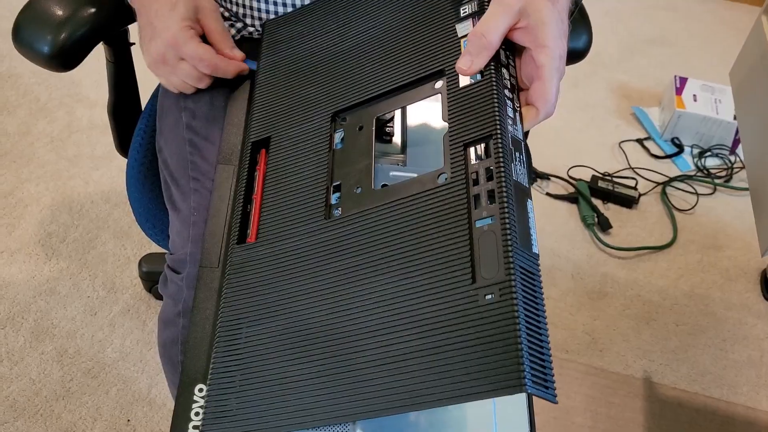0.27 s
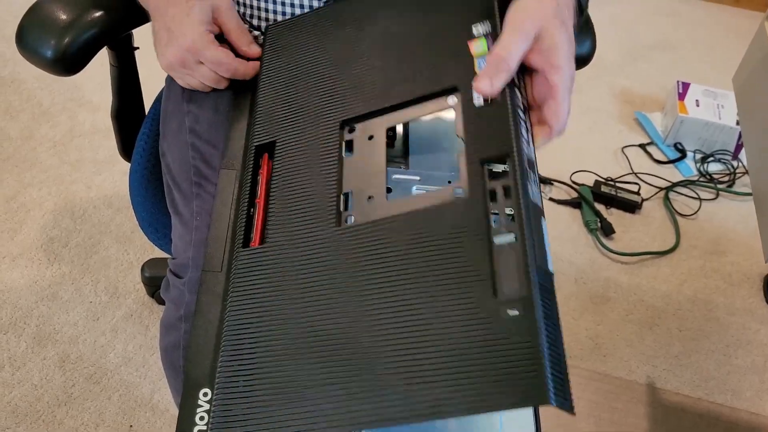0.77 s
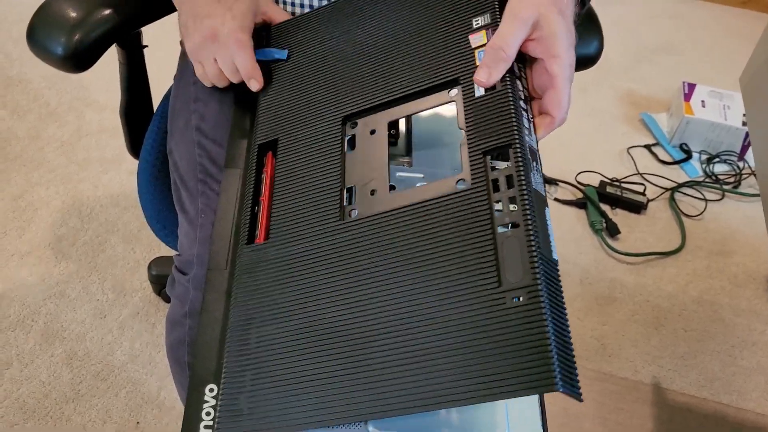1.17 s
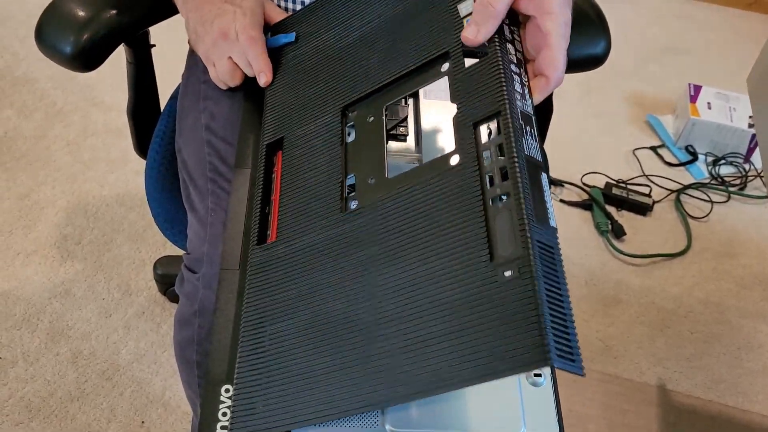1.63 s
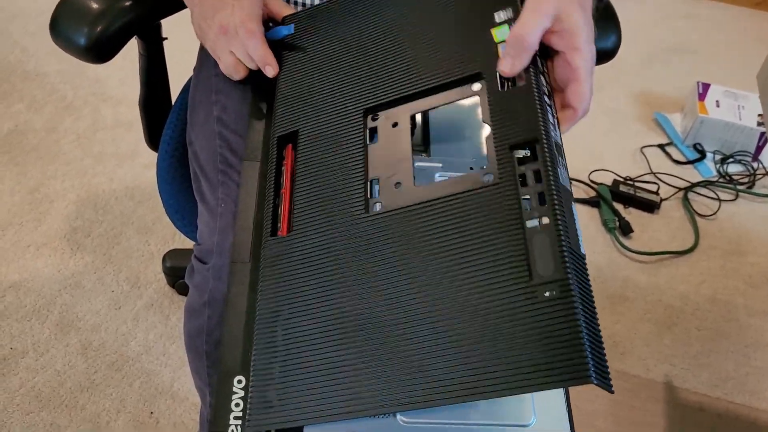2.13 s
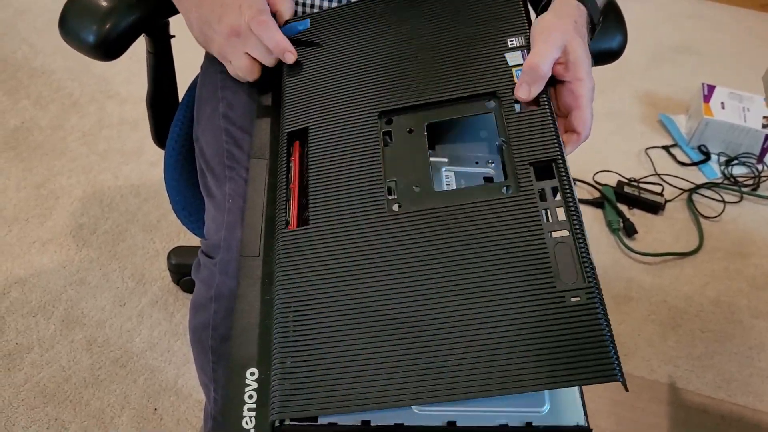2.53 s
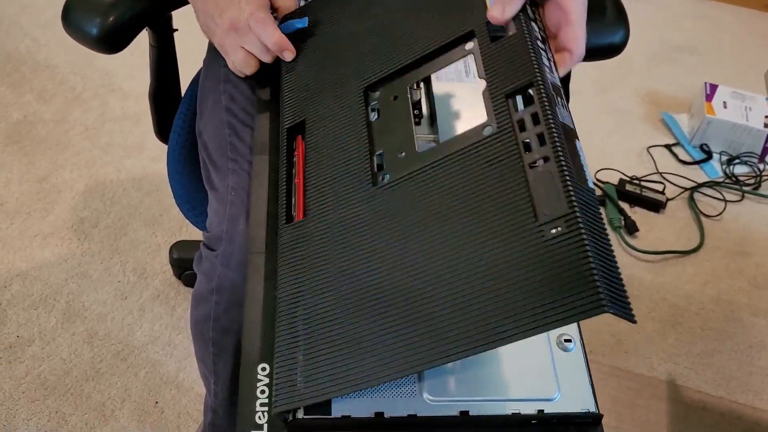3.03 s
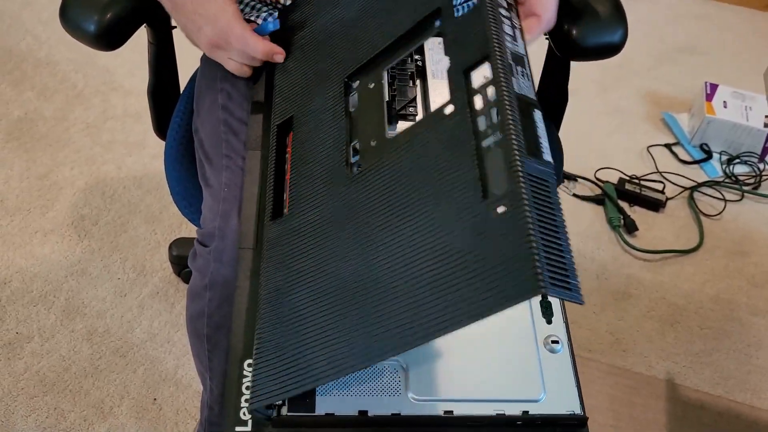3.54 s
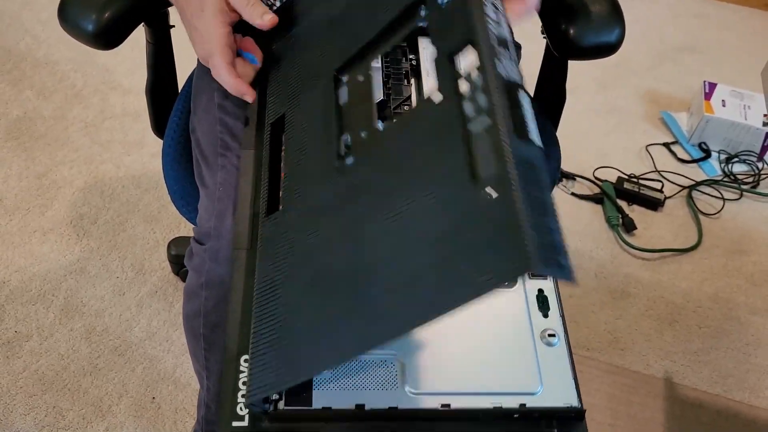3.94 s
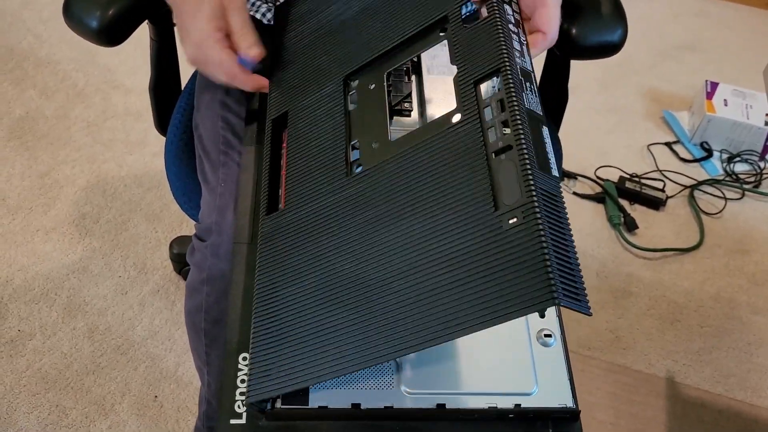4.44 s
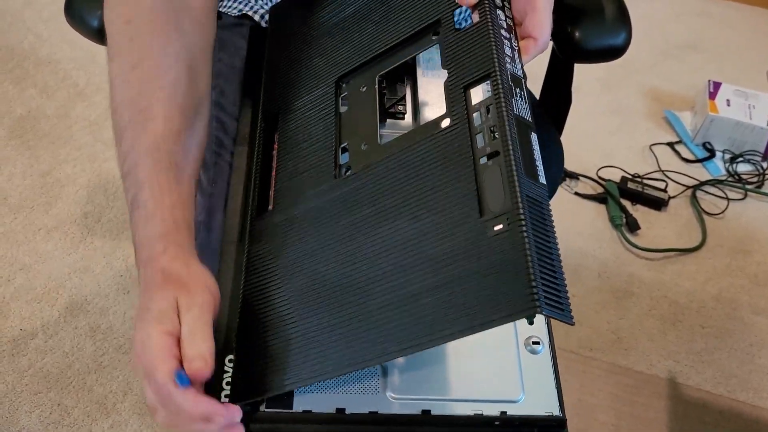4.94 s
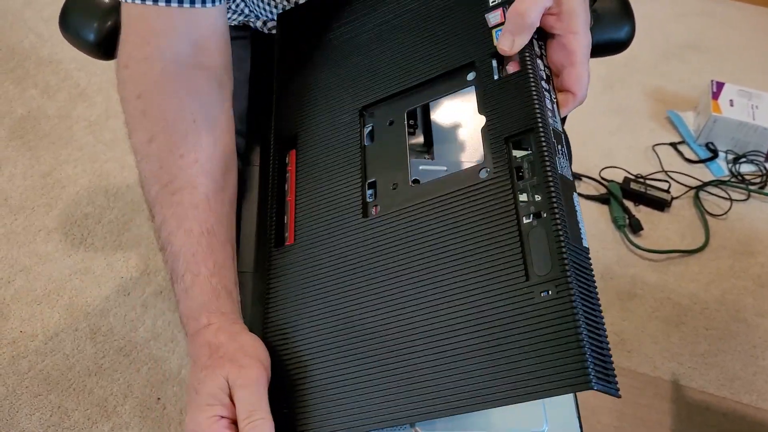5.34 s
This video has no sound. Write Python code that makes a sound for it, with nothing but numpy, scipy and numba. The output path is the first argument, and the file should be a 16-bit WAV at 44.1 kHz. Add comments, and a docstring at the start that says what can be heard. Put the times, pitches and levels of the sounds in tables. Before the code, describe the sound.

Close stereo sound of a plastic back cover being pulled off a computer by hand in a small carpeted room. Quiet air and a faint low rumble lie beneath. From 0 to 1.5 seconds the panel creaks and fingers rub dryly while latches slip: a sharp click near 0.4, several around 0.55 to 0.7, a quick clattering cluster at 0.9, another at 1.15, then smaller ticks. At about 1.57 a very loud, hard double snap rings briefly through the panel. From 2 to 3 only faint creaks, soft rubbing and tiny ticks remain. Small clicks at 3.15 precede a loud hollow pop at 3.43, a bright cracking burst at 3.62 to 3.67, and another double snap at 4.07; low air puffs thump on the left, strongest near 3.68. Each pop is dry, with a short room tail. After 4.3 it falls nearly silent, with slight creaks and a light tick near 5.24.

```python
"""In a carpeted room, hands pry a plastic back cover off a computer, close to two microphones.
Each latch that lets go strikes the panel's damped modes and adds a treble crack; filtered noise makes
the creak and skin hiss of rubbing fingers. Short air puffs, cosines that swell and fade about their centre,
push mainly the left microphone. Decaying noise is the room's reverberation; quiet air and a low rumble
lie beneath. A look-ahead limiter holds the loudest pops down."""
import sys
import numpy as np
from scipy import signal
from scipy.fft import rfft, irfft, next_fast_len
from scipy.io import wavfile
from scipy.ndimage import uniform_filter1d
from numba import njit

SR = 44100
rng = np.random.default_rng(int(sys.argv[2]) if len(sys.argv) > 2 else 0)


def wav_record(signal):
    """Record a signal, one row per channel, as 16-bit PCM in the file named by sys.argv[1]."""
    frames = np.transpose(np.atleast_2d(signal))
    bounded = np.clip(frames, -1, 1)
    # unit amplitude maps onto the largest positive 16-bit level
    quanta = np.round(bounded * 32767).astype(np.int16)
    wavfile.write(sys.argv[1], SR, quanta)


N = 246959  # length [samples]

# Spectrum of the room air: (frequency [Hz], relative density [dB per Hz]), then its overall level [dB]
AIR_SPECTRUM, AIR_LEVEL_DB = [(18, -39), (30, -6.5), (65, 2.5), (107, -11.5), (314, -5.5), (519, -25),
                              (2220, -21), (3760, -31), (7280, -20), (15200, -30.5), (16500, -31.5)], -69.5
# Level of the low rumble: (time [s], level [dB])
RUMBLE_LEVEL = [(0.0, -61.5), (0.43, -66), (1.1, -65), (1.3, -60), (1.62, -61.5), (1.9, -70), (2.65, -68),
                (3.0, -69), (3.3, -61), (3.45, -59), (3.77, -67.5), (4.15, -66), (4.6, -80), (5.2, -73),
                (5.47, -65), (5.6, -68)]
# Spectrum of the rumble: (frequency [Hz], relative level [dB])
RUMBLE_SPECTRUM = [(25, -43), (45, -11.5), (70, -1.0), (95, -5.5), (140, -8.5), (200, -22), (400, -57.5)]
# Coherence of diffuse sound: (frequency [Hz], left-right correlation [-1 to 1])
COHERENCE = [(60, .6), (130, .85), (290, .85), (640, .72), (1410, .25), (3100, .08), (7000, 0)]
# Reverberation time of the room: (frequency [Hz], 60 dB decay time [s])
REVERBERATION = [(200, 0.49), (700, 0.27), (2000, 0.37), (5000, 0.45), (12000, 0.37)]
ROOM_DB = -7
# Air puffs: (centre time [s], frequency [Hz], peak level before the microphone balance [dB])
AIR_PUFFS = [(3.456, 47.6, -35), (3.676, 51.97, -10), (4.081, 50, -22.5)]
# Rubbing and bending of the panel: (time [s], relative creak level [dB], relative skin hiss level [dB])
RUBBING = [(0.0, -49, -69.5), (0.11, -54.5, -47), (0.246, -43, -54.5), (0.37, -51, -57),
           (0.586, -52.5, -44), (0.78, -49.5, -58), (0.954, -48.5, -50.5), (1.078, -48.5, -42),
           (1.246, -45, -59.5), (1.39, -54, -52), (1.55, -50, -46.5), (1.87, -54, -65), (1.99, -70, -65.5),
           (2.05, -50.5, -47), (2.18, -54, -57), (2.229, -65.5, -65), (2.39, -55.5, -60.5),
           (2.508, -56.5, -53), (2.588, -49, -55), (2.728, -62, -63.5), (2.86, -57.5, -63),
           (3.048, -57.5, -69), (3.184, -53.5, -56), (3.36, -61, -60), (3.88, -53, -65), (4.06, -68, -79),
           (4.32, -49.5, -67.5), (4.42, -68, -84), (4.6, -82, -81), (4.88, -87, -78), (5.016, -70, -67),
           (5.258, -57.5, -70.5), (5.411, -58.5, -62.5), (5.533, -71, -73.5), (5.6, -63, -72.5)]
# Slips and pops of the latches: (time [s], relative peak level [dB], favoured frequency [Hz],
# tilt [dB per octave], relative crack level [dB], relative sizzle level [dB], rattle length [ms])
LATCH_POPS = [(0.213, -35, 584, -6, -21, -28, 15), (0.274, -27.5, 1850, -2.5, -19.5, -41, 8.6),
              (0.293, -21, 638, -2.5, -31.5, -39.5, 9.3), (0.385, -11, 1036, 0.5, -15.5, -35.5, 7.2),
              (0.441, -25, 1040, 0.5, -31, -33.5, 9.3), (0.5, -22.5, 890, 2.5, -22, -35, 5.2),
              (0.536, -21.5, 855, 5, -15, -9.5, 25), (0.543, -11, 900, -3, -20, -14, 5.7),
              (0.670, -16, 1030, 3, -13.5, -20.5, 3.6), (0.733, -27, 625, -2, -33, -41, 4.7),
              (0.853, -33.5, 550, -4.5, -36, -24, 16), (0.908, -18.5, 595, -1.5, -29, -33, 6.4),
              (0.921, -18.5, 570, 4.5, -23, -29, 11), (0.934, -14, 1900, 4, -15.5, -29, 9.5),
              (0.945, -12, 504, 4, -21.5, -30, 5.5), (1.161, -14, 1990, -1, -27.5, -34.5, 15),
              (1.188, -31.5, 1020, -2.5, -22.5, -32, 8.5), (1.311, -31.5, 1030, -4, -42, -33, 9.1),
              (1.4, -23, 574, 3.5, -17.5, -25.5, 8.6), (1.441, -40.5, 480.4, -2, -6.5, -14, 1.9),
              (1.492, -31.5, 1030, 1, -18, -29.5, 5), (1.562, 3, 675, 2.5, -16.5, -16, 4.1),
              (1.573, -2.5, 2490, 1, -10, -12.5, 9.2), (1.939, -39.5, 630, 3, -18.5, -24, 3.6),
              (2.495, -34.5, 530, -0.5, -17, -15, 18), (2.584, -43, 1510, 7, -14, -30, 13),
              (2.68, -40.5, 850, -4, -20, -32, 8.8), (2.776, -42, 593, 4, -19, -22, 24),
              (2.884, -43.5, 595, 5, -15, -22, 23), (3.059, -38.5, 681, -7, -17, -15, 11),
              (3.14, -26, 620.5, -0.5, -24.5, -30, 8), (3.168, -18, 556.5, 0.5, -17, -29, 7.7),
              (3.209, -34.5, 518, 0.5, -17, -18, 5.3), (3.245, -41, 595, -3.5, -23, -27.5, 4.6),
              (3.396, -41.5, 509, -7, -20, -17.5, 2.7), (3.429, -1.5, 533, 4, -10, -11, 7.5),
              (3.438, -3.5, 846, -4.5, -17.5, -19.5, 8.6), (3.619, 4, 1790, 2, -12, -14.5, 2.8),
              (3.659, -1, 914, 3, -14.5, -9, 5), (3.672, -3.5, 2450, -1.5, -15, -10, 13),
              (3.986, -40, 670, 1.5, -17.5, -25, 9.9), (4.066, -3, 983, 3, -21, -14, 7.7),
              (4.076, 2, 2470, 0.5, -13, -9, 8), (4.301, -37, 727, -2.5, -20, -33, 6.1),
              (4.345, -41.5, 890, -6, -22, -40, 8), (4.48, -48, 596, 2, -23, -35, 17.2),
              (4.967, -56.5, 464, 11.5, -4.5, -17.5, 18), (5.111, -40.5, 620, -4, -24, -37, 19),
              (5.2, -41.5, 765, 3.5, -17, -25, 11), (5.238, -30.5, 2300, -1.5, -21.5, -30, 4.2),
              (5.308, -49, 910, -9.5, -28, -32, 3.9), (5.386, -49, 850, -5.5, -21, -32, 17),
              (5.448, -42.5, 670, 0.5, -18, -32, 8.2), (5.538, -52, 573, -6.5, -37, -38, 8),
              (5.57, -42, 663, -7, -33, -46.5, 13)]
# Modes of the panel: (frequency [Hz], relative level [dB], 60 dB decay time before its cap [s])
PANEL_MODES = [(234, 3, 0.16), (227, 3, 0.008), (285, -0.5, 0.072), (373, 1, 0.18), (417, 1, .07),
               (482, -8, 0.12), (565, -0.5, 0.15), (595, 15, 0.034), (670, 11.5, 0.076),
               (757.3, 9.5, 0.071), (867, 10.5, 0.036), (930.6, 9, 0.15), (1008, 14.5, 0.0084),
               (1253, 3, 0.086), (1218, -6, 0.0049), (1600, 10, 0.0067), (1738, 2, 0.02), (1825, 9.5, 0.02),
               (2054, 4, 0.026), (2128, 8, 0.019), (2361, 12.5, 0.0088), (2507, -2, 0.06),
               (2680, 9, 0.0082), (2913, -6, .02), (3226, 5, 0.014), (4104, -2, 0.0017), (4380, 1, 0.03)]
# Centres of the thud, knock, clack and ring bands: (frequency [Hz])
BAND_CENTRES = [300, 750, 1600, 2600]
# Levels of those four bands in an untilted pop, then in the creak: (relative level [dB])
POP_BANDS = [-22, -15, -18.5, -12]
CREAK_BANDS = [-2.5, -6, -9.5, -5.5]
# Spectrum of the treble crack and hiss: (frequency [Hz], relative density [dB per Hz])
CRACK_SPECTRUM = [(2060, -26), (3500, -5.5), (4390, -4.5), (4750, -3.5), (7010, -5), (8910, -13),
                  (12600, -3.5), (13900, -12), (15200, -6), (16200, -24), (16500, -46.5)]
# Balance of the microphones: (frequency [Hz], left minus right [dB])
MICROPHONE_BALANCE = [(60, -2), (110, -0.5), (200, 1), (380, 0.5), (700, 0.5), (1290, 0.5), (2380, -7),
                      (4400, -3.5), (8120, -1), (15000, 6)]

PIVOT_HZ = 1200  # a pop's tilt turns about this pitch
SPLIT_HZ = 8500  # crack below, sizzle above
SNAP_DB, SNAP_DB_PER_MS = 3, -0.83  # release against rattle energy: long rattles start softer
FORCE_SAMPLES = RING_SAMPLES = 4096
RIGHT_LAG = 2  # samples by which the direct sound reaches the right microphone later
LIMIT_DB, RATIO, RELEASE_S, AHEAD_S = -15.5, 2.05, 0.033, 0.007
TOP_HZ = 16100


def undb(db):
    """Level law: amplitude ratio of a level in dB."""
    return 10 ** (np.asarray(db) / 20)


def unit(x):
    """Normalisation to unit root-mean-square amplitude."""
    return x / np.sqrt(np.mean(x ** 2))


def shape(x, table, law=undb):
    """Linear filtering: weights the spectrum by a (frequency [Hz], value) table, straight on a log axis."""
    size = next_fast_len(x.shape[-1])
    table_hz, value = np.transpose(table)
    bin_hz = np.maximum(np.arange(size // 2 + 1) * SR / size, 1)
    weight = law(np.interp(np.log(bin_hz), np.log(table_hz), value))
    return irfft(rfft(x, size) * weight, size)[..., :x.shape[-1]]


def pair(count):
    """Diffuse-field coherence: mid and side noise make two channels alike in the bass, unlike in the treble."""
    mid, side = rng.standard_normal((2, count))
    mid = shape(mid, COHERENCE, lambda c: np.sqrt(1 + np.clip(c, -1, 1)))
    side = shape(side, COHERENCE, lambda c: np.sqrt(1 - np.clip(c, -1, 1)))
    return np.array([mid + side, mid - side]) / np.sqrt(2)


def walk(rows, rate):
    """Random fluctuation: smoothed random steps, "rate" of them per second, spread near 1."""
    k = int(SR / rate)
    steps = np.repeat(rng.standard_normal((rows, N // k + 1)), k, axis=1)[:, :N]
    return 1.31 * uniform_filter1d(steps, size=k, axis=1)


def spikes(count, spread_db):
    """Impulsive noise: samples scatter exponentially in level, which is heard as crackle."""
    excess_db = spread_db * np.minimum(rng.exponential(size=count), 4)
    return unit(rng.standard_normal(count) * undb(excess_db))


def background():
    """Filtered noise: steady quiet room air, and a low rumble that rises and falls by its own level table."""
    air = undb(AIR_LEVEL_DB) * unit(shape(pair(count=N), AIR_SPECTRUM))
    rumble = unit(shape(pair(count=N), RUMBLE_SPECTRUM))
    rumble_db = np.interp(np.arange(N) / SR, *np.transpose(RUMBLE_LEVEL)) + 1.4 * walk(1, rate=5.0)
    return air + undb(rumble_db) * rumble


def room(dry):
    """Reverberation: convolution with a diffuse tail that swells in, each band with its own decay."""
    age = np.arange(SR // 2) / SR
    noise, tail = pair(count=SR // 2), 0
    for k, (_, t60) in enumerate(REVERBERATION):
        # overlapping bands whose weights add up to one
        band = [(hz, float(j == k)) for j, (hz, _) in enumerate(REVERBERATION)]
        tail = tail + shape(noise, band, lambda w: w) * undb(-60 * age / t60)
    tail = tail * (1 - np.exp(-(age / 0.002) ** 2))
    tail = tail / np.sqrt(np.sum(tail ** 2) / 2)
    mono = dry.mean(axis=0)[None]
    return undb(ROOM_DB) * signal.fftconvolve(mono, tail, axes=1)[:, :N]


def puffs():
    """Air displacement by the flapping cover: a cosine that swells and fades about its centre, mainly left."""
    t, pressure = np.arange(N) / SR, 0
    for centre, hz, db in AIR_PUFFS:
        offset = t - centre
        # negative at the centre: the microphone is pressed in
        pressure = pressure - undb(db) * np.exp(-(offset * hz / 0.6) ** 2) * np.cos(2 * np.pi * hz * offset)
    return pressure * undb([[0], [-22.]])  # left, right


def modes():
    """Modal vibration: decaying sine of each mode at both microphones, further apart in phase with pitch."""
    hz, db, t60 = np.transpose(PANEL_MODES)[:, :, None, None]
    age = np.arange(RING_SAMPLES) / SR
    sign = (-1) ** np.arange(len(PANEL_MODES))[:, None, None]
    phase = sign * np.minimum(hz / 2430.0, np.pi / 2) * np.array([[.5], [-.5]])
    ring = np.sin(2 * np.pi * hz * age + phase) * undb(-60 * age / np.minimum(t60, .065))
    # the plate takes about a cycle to swing up
    ring = ring * (1 - np.exp(-(age * hz / .7) ** 2))
    return undb(db) * ring / np.sqrt(np.sum(ring ** 2, axis=2, keepdims=True))


def spread(band_db):
    """Spectral interpolation: thud, knock, clack and ring levels spread over the modes."""
    mode_hz = np.array(PANEL_MODES)[:, 0]
    return np.interp(np.log(mode_hz), np.log(BAND_CENTRES), band_db)


def rubbing():
    """Friction: relative creak and skin hiss levels in dB at every sample."""
    time, *levels = np.transpose(RUBBING)
    return [np.interp(np.arange(N) / SR, time, db) for db in levels]


def creaking(rings, creak_db):
    """Friction-driven resonance: unsteady noise excites every mode of the panel."""
    # the fingers shift, so each mode is rubbed in its own fits and starts
    wander_db = 4.3 * walk(len(PANEL_MODES), rate=20.) + 2. * walk(1, rate=360.0)
    grip = undb(creak_db + spread(CREAK_BANDS)[:, None] - 18.5 + wander_db)
    size = next_fast_len(N + RING_SAMPLES)
    creak = sum(rfft(g * rng.standard_normal(N), size) * rfft(ring, size) for g, ring in zip(grip, rings))
    return irfft(creak, size)[:, :N]


def forces(rattle_ms):
    """Impact excitation: a sharp release, then the loose edge chatters out; total energy 1."""
    age = np.arange(FORCE_SAMPLES) / SR
    chatter = np.exp(-1000 * age / np.clip(rattle_ms, 1, 20))
    snap = np.exp(-age / 0.0005)
    snap_energy = undb(2 * (SNAP_DB + SNAP_DB_PER_MS * rattle_ms))
    power = chatter / chatter.sum() + snap_energy * snap / snap.sum()
    return np.sqrt(power / power.sum())


def pops(rings):
    """Modal excitation: a pop drives modes near its favoured pitch hardest; the latch gives the treble power."""
    body = np.zeros((2, N + 16384))
    treble = np.zeros((2, 2, N + 16384))  # power: crack or sizzle, microphone, sample
    octave = np.log2(np.array(PANEL_MODES)[:, 0])
    size = FORCE_SAMPLES + RING_SAMPLES
    rings = rfft(rings, size)
    power = np.sum(abs(rings) ** 2, axis=1)
    for start, peak_db, hz, tilt_db, *treble_db, rattle_ms in LATCH_POPS:
        i, fall = int(start * SR), forces(rattle_ms)
        tilt_octaves = np.minimum(octave, np.log2(BAND_CENTRES[-1])) - np.log2(PIVOT_HZ)
        favour_db = 7.8 * np.exp(-((octave - np.log2(hz)) / 0.11) ** 2)
        scatter_db = 2 * rng.standard_normal(len(octave))
        weight = undb(spread(POP_BANDS) + tilt_db * tilt_octaves + favour_db + scatter_db)
        push = rfft(fall * spikes(len(fall), 2.5), size)
        # every mode takes its full share of the blow, whatever the grain of the chatter
        weight = weight * np.sqrt(power.sum(axis=1) / (power @ abs(push) ** 2))
        body[:, i:i + size] += undb(peak_db + 13.5) * irfft(push * np.tensordot(weight, rings, 1), size)
        treble_gain = undb(peak_db + np.array(treble_db) + 29.5)[:, None, None]
        treble[:, :, i:i + len(fall)] += (treble_gain * fall) ** 2
    return body[:, :N], treble[:, :, :N]


def cracking(treble, skin_db):
    """Impulsive broadband radiation: latch cracks and skin hiss add in power and modulate crackling noise."""
    skin = undb(2 * (skin_db - 3.5 + 1.3 * walk(1, rate=290.0)))
    grain = np.array([spikes(N, 0.82), spikes(N, 1.6)])  # left, right
    low, high = np.sqrt(treble + skin) * grain
    crossover = [(SPLIT_HZ / 1.15, 0), (SPLIT_HZ * 1.15, 1)]
    joined = shape(low, crossover, lambda w: 1 - w) + shape(high, crossover, lambda w: w)
    return undb(11.5) * shape(joined, CRACK_SPECTRUM)


def panel():
    """Plate radiation: the cover pops, creaks under the hands and hisses against the skin."""
    rings = modes()
    creak_db, skin_db = rubbing()
    body, treble = pops(rings)
    # a thin free panel radiates no deep bass
    bass_cut = signal.butter(3, 150, "high", fs=SR, output="sos")
    ringing = signal.sosfilt(bass_cut, body + creaking(rings, creak_db))
    return ringing + cracking(treble, skin_db)


def scene():
    """Superposition of the direct sound, its reverberation, the puffs and the background."""
    dry = panel()
    right = np.append(np.zeros(RIGHT_LAG), dry[1, :-RIGHT_LAG])
    direct = np.array([dry[0], right])
    return direct + room(dry) + puffs() + background()


@njit
def follow(peak, release):
    """Peak detection: jumps up with the peak, sinks back exponentially."""
    out, level = np.empty(len(peak)), 0.
    for i in range(len(peak)):
        level = max(peak[i], level * release)
        out[i] = level
    return out


def record(dry):
    """Transduction: microphone balance, look-ahead limiting, clipping at 0.8 of full scale, top cut."""
    left = shape(dry[0], MICROPHONE_BALANCE, lambda db: undb(db / 2))
    right = shape(dry[1], MICROPHONE_BALANCE, lambda db: undb(-db / 2))
    heard = np.array([left, right])
    ahead = max(int(AHEAD_S * SR), 2)
    loud = np.sqrt(np.abs(uniform_filter1d(np.mean(heard ** 2, axis=0), size=128)))
    # the level is read early, so the gain falls just ahead of a loud peak
    early = np.append(loud[ahead:], np.zeros(ahead))
    envelope = follow(early, np.exp(-1 / (RELEASE_S * SR)))
    gain = np.minimum(1, undb(LIMIT_DB) / (envelope + 1e-9)) ** (1 - 1 / max(RATIO, 1))
    held = heard * uniform_filter1d(gain, size=ahead // 2)
    top_cut = signal.ellip(10, .1, 80, TOP_HZ, fs=SR, output="sos")
    return signal.sosfilt(top_cut, np.clip(held, -.8, .8))


dry = scene()
out = record(dry)
wav_record(out)
```